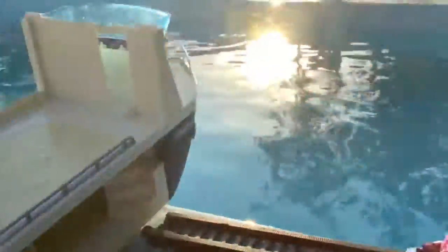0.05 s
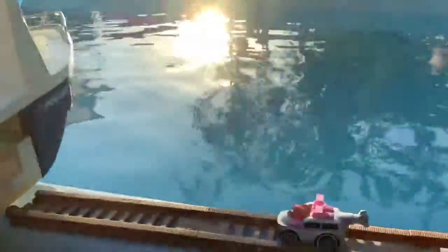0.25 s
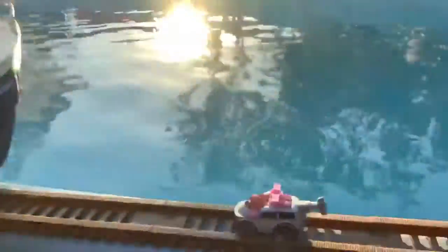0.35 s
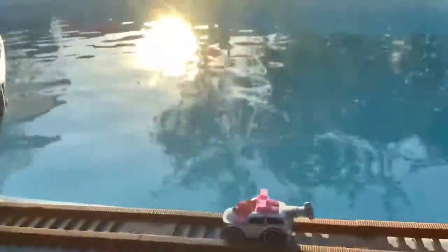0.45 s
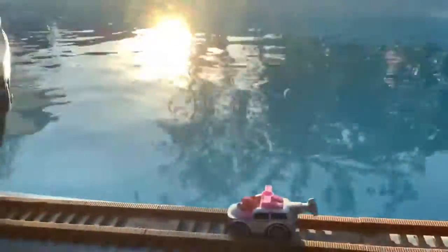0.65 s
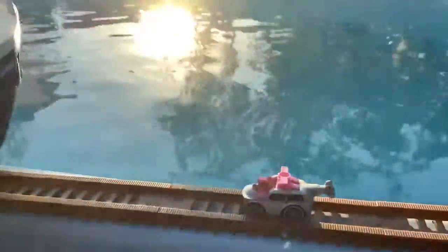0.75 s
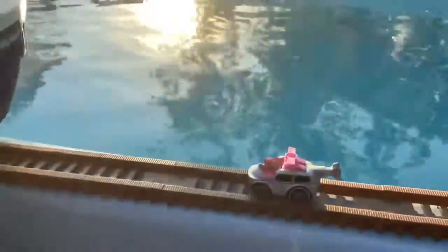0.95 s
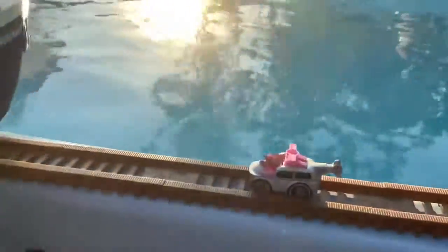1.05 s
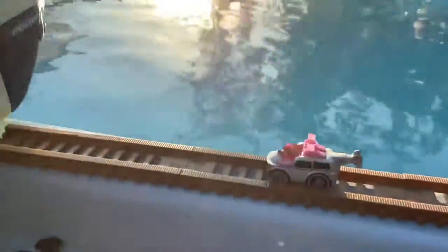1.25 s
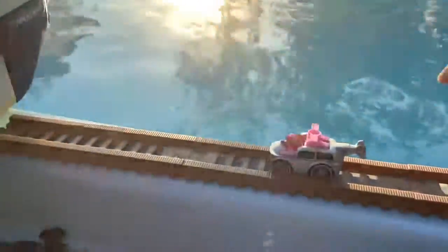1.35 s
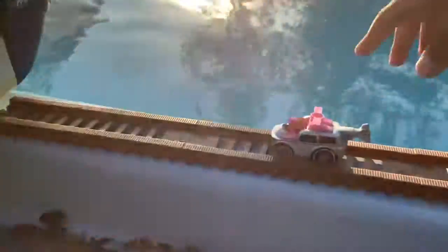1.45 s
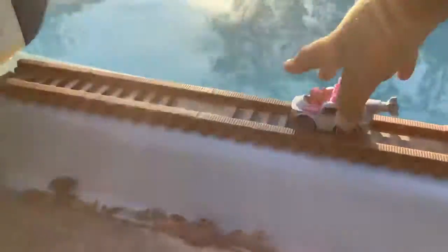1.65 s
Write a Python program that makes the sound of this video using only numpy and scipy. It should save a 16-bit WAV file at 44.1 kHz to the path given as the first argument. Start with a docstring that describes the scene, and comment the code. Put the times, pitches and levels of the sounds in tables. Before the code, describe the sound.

A small toy vehicle hits a plastic track at about 0.2 seconds with close, hollow knocks and sharp clicks. It scrapes briefly, thumps again around 0.4 seconds, then knocks and clacks just after 0.6. Faint wheel ticks follow until about 1 second as it rolls to rest. A few soft bumps and scuffs continue to around 1.7 seconds over a quiet, low outdoor rumble.

```python
"""Toy vehicle on a plastic track

A small toy is set on a plastic track beside a pool, very close. Each knock spreads as it travels through
the plastic, treble first and bass last, and lands as a short hollow thump. Hard edges click, the shell
clacks, the toy scrapes and rolls with faint ticks, then a few soft bumps sink into a low outdoor bed."""
import sys
import numpy as np
from scipy.fft import rfft, irfft, next_fast_len
from scipy.io import wavfile
from scipy.ndimage import map_coordinates

SR = 44100
rng = np.random.default_rng(int(sys.argv[2]) if len(sys.argv) > 2 else 0)


def output_pcm(signal):
    """Save a mono or channel-first signal as 16-bit PCM at the path in sys.argv[1].

    Samples are clipped to [-1, 1] before scaling.
    """
    pcm = np.clip(np.atleast_2d(signal).T, -1, 1) * 32767
    wavfile.write(sys.argv[1], SR, np.round(pcm).astype(np.int16))


N = 74970

# outdoor bed, EQ of the rumble and of the air above it: f/Hz, level/dB
RUMBLE_EQ = [(55, -3.5), (120, -1), (190, -7), (320, -8.5), (420, -20), (750, -22.5), (1200, -38.5)]
AIR_EQ = [(410, -14), (700, -5.5), (1450, -5.5), (6000, -21.5), (16000, -33.5)]
# fader ride of the air: t/s, level/dB
AIR_RIDE = [(0, -65), (.9, -61.5), (1.12, -63.5), (1.36, -57), (1.56, -60.5), (1.66, -52.5)]
# fader rides of the sliding toy's scrape, hiss and swish: t/s, level/dB
SCRAPE_RIDE = [(.17, -56), (.21, -37), (.28, -36), (.297, -30.5), (.34, -27), (.43, -33), (.52, -40.5),
               (.61, -34), (.70, -43.5), (.80, -40.5), (1.0, -51.5)]
HISS_RIDE = [(.17, -65), (.235, -49), (.275, -59.5), (.305, -48.5), (.37, -48.5), (.47, -55), (.605, -54),
             (.635, -61.5), (.655, -54.5), (.72, -64), (.97, -64.5), (1.03, -78)]
SWISH_RIDE = [(.74, -86), (.795, -54), (.85, -92)]
# EQ of the same three layers: f/Hz, level/dB
SCRAPE_EQ = [(30, -11.5), (90, 4), (330, -8), (600, -14), (1150, -26), (1600, -23.5), (3000, -33.5),
             (6000, -42)]
HISS_EQ = [(2500, -14), (6000, -11.5), (7600, -1.5), (9600, 0), (11000, -7.5), (15500, -15)]
SWISH_EQ = [(10500, -5), (13200, -4), (14500, -16)]
# blows on the track: t/s, level/dB, bass edge/Hz, treble edge/Hz, roll-off/(dB/octave), lag at 100 Hz/ms
KNOCK_CUES = [ (0.1849, -25.5, 170, 330, 22, 7), (0.2245, -4.5, 69, 760, 14.5, 3.25),
              (0.2275, -2, 103, 2270, 18.5, 8.54), (0.2361, -5.5, 121, 120, 29, 6.42),
              (0.3805, -1.5, 170, 171, 16, 9.5), (0.3944, -9.5, 69.4, 131, 26, 4.9),
              (0.4389, -7, 53.7, 1280, 28, 7.3), (0.4418, -3.5, 48.2, 216, 20.5, 4.59),
              (0.4458, -10, 480, 1410, 12, 7.09), (0.4783, -25.5, 149, 500, 20, 11),
              (0.5656, -14.5, 85, 345, 17.5, 9.5), (0.6214, -5.5, 51, 1100, 14.5, 10.84),
              (0.6221, -0.5, 274, 273, 14, 4.1), (0.6535, -14.5, 120, 170, 14, 6.36),
              (1.050, -35.5, 139, 257, 19, 7.89), (1.145, -31.5, 74.5, 128, 14, 7.83),
              (1.206, -34, 99, 219, 17, 7.8), (1.392, -29.5, 109, 170, 15, 12.2),
              (1.663, -30.5, 57.7, 200, 7, 8), ]
# clicks of hard edges and light scuffs: t/s, level/dB, t60/s
CLICK_CUES = [(.2221, -15, 0.0093), (.2231, -14, 0.017), (.2325, -28, 0.052), (.2905, -29, 0.0074),
              (.3275, -22, .005), (.3400, -13.5, 0.0041), (.3417, -13.5, .005), (.4392, -28, 0.022),
              (.6222, -16.5, 0.0098), (.6516, -24.5, 0.024)]
SCUFF_CUES = [(1.006, -41.5, 0.077), (1.387, -34.5, 0.062), (1.664, -34.5, 0.088)]
# short taps on the track, bright wheel ticks and a few dull little knocks, all given one colour: t/s, level/dB
TICK_CUES = [(.73, -36), (.741, -34), (0.7566, -34.5), (.7996, -31.5), (.8445, -38), (0.8618, -37.5),
             (.881, -37), (.9356, -32), (.9530, -26.5)]
# EQ of the clicks, ticks and scuffs: f/Hz, level/dB
CLICK_EQ = [(1500, -10), (4000, -4.5), (6000, -9), (8000, -2.5), (9500, -2.5), (12000, -9.5), (15500, -27)]
TICK_EQ = [(300, -1), (3600, 0), (6000, -7), (9500, -2), (13000, -26)]
SCUFF_EQ = [(750, 1), (1500, 5.5), (2500, -9.5), (5000, -11.5), (8000, -25)]
# resonances of the dragged wheels, each at its loudest: f/Hz, level/dB, t/s
WHEEL_RESONANCES = [(564.6, -31.5, .353), (860, -39, .322), (1577, -42, 0.328), (2970, -49, .317)]
# hits on the toy's shell: t/s, level/dB
CLACK_CUES = [(0.6214, -23), (.6518, -10.5)]
# modes of the shell: f/Hz, level/dB, t60/s
SHELL_MODES = [(1780, -2, 0.0086), (2195, -4.5, 0.0088), (3750, -5, 0.0053), (6760, -17, 0.0053)]


def amp(db):
    """Decibels to gain."""
    return 10 ** (np.asarray(db) / 20)


def unit(x):
    """Scale to rms 1."""
    return x / np.sqrt(np.mean(x ** 2) + 1e-20)


def noise(eq, length=N):
    """Noise of rms 1 through an EQ of (f/Hz, level/dB) points, rolling off steeply outside them."""
    size = next_fast_len(length + 8192)
    octave = np.log2(np.fft.rfftfreq(size, 1 / SR) + 1)
    hz, db = np.transpose(eq)
    knots = np.log2(hz + 1)
    outside = np.abs(octave - np.clip(octave, knots[0], knots[-1]))
    gain = amp(np.interp(octave, knots, db) - 20 * outside)
    return unit(irfft(rfft(rng.standard_normal(length), size) * gain, size)[:length])


def fluttering_noise(eq, depth_db, rate_hz):
    """Coloured noise of rms 1 whose level flutters at random."""
    flutter = map_coordinates(rng.standard_normal(1024), [np.arange(N) * rate_hz / SR], mode="mirror")
    return unit(noise(eq) * amp(depth_db * flutter))


def fader(ride):
    """Gain per sample from (t/s, level/dB) points."""
    return amp(np.interp(np.arange(N) / SR, *np.transpose(ride)))


def minimum_phase(db):
    """Spectrum of the tightest causal pulse with the shape db."""
    cepstrum = irfft(np.log(np.maximum(amp(db - db.max()), 1e-6)))
    half = len(cepstrum) // 2
    return np.exp(rfft(np.r_[cepstrum[0], 2 * cepstrum[1:half], np.zeros(half)]))


def add(track, s, sound):
    """Mix a sound into the track at time s."""
    start = round(s * SR)
    track[start:start + len(sound)] += sound[:max(N - start, 0)]


def bursts(cues, eq, attack_s=.0001):
    """Short dying bursts of noise through one EQ, from cues of t/s, level/dB, t60/s."""
    out, t = np.zeros(N), np.arange(SR // 10) / SR
    for s, db, t60 in cues:
        envelope = amp(db - 60 * t / t60) * (1 - np.exp(-t / attack_s))
        add(out, s, noise(eq, len(t)) * envelope / 2)
    return out


def outdoor_bed(rumble_db=-45.5):
    """A low outdoor rumble with faint air above it."""
    rumble = amp(rumble_db) * fluttering_noise(RUMBLE_EQ, depth_db=1, rate_hz=20)
    return rumble + fader(AIR_RIDE) * noise(AIR_EQ)


def whine(hz=10040, db=-73.5, end_s=.96, fade_s=.05):
    """A thin, nearly steady whine that stops as the toy comes to rest."""
    t = np.arange(N) / SR
    phase_drift = np.cumsum(rng.standard_normal(N)) * 12 / np.sqrt(SR)
    fade = np.clip((end_s - t) / fade_s, 0, 1)
    return amp(db) * unit(np.sin(2 * np.pi * hz * t + phase_drift)) * fade


def sliding(hiss_rise=1.07, rise_span_s=(.37, .62)):
    """Plastic rubs on plastic: a gritty low scrape, a fine hiss that climbs a little, one last swish."""
    scrape = fader(SCRAPE_RIDE) * fluttering_noise(SCRAPE_EQ, depth_db=3, rate_hz=110)
    raised_eq = [(hz * hiss_rise, db) for hz, db in HISS_EQ]
    crossfade = np.interp(np.arange(N) / SR, rise_span_s, [0, np.pi / 2])
    hiss = np.cos(crossfade) * noise(HISS_EQ) + np.sin(crossfade) * noise(raised_eq)
    return scrape + fader(HISS_RIDE) * hiss + fader(SWISH_RIDE) * noise(SWISH_EQ)


def knocks(lag_power=.91, lag_knee_hz=20.36, tilt_db_per_oct=-4.5, low_cut_db_per_oct=21):
    """Each blow is one pulse; bending waves carry its bass more slowly, making a falling thump."""
    out, size = np.zeros(N), 8192
    f = np.fft.rfftfreq(size, 1 / SR) + 1
    lag_shape = ((100 + lag_knee_hz) / (f + lag_knee_hz)) ** lag_power
    tilt = tilt_db_per_oct * np.log2(f)
    for s, db, low_hz, high_hz, roll_off, lag_ms in KNOCK_CUES:
        octaves_below = np.log2(1 + (low_hz / f) ** 6) / 6
        octaves_above = np.log2(1 + (f / high_hz) ** 6) / 6
        blow = minimum_phase(tilt - low_cut_db_per_oct * octaves_below - roll_off * octaves_above)
        lag_s = lag_ms / 1000 * lag_shape
        turns = np.cumsum(lag_s[::-1])[::-1] * SR / size  # phase is lag summed over frequency
        thump = irfft(blow * np.exp(2j * np.pi * turns))[:size // 2]
        add(out, s, amp(db) * thump / np.abs(thump).max())
    return out


def contacts(tick_t60=.004):
    """Hard edges click, wheels tick, small dull knocks tap the track and the toy lightly scuffs it."""
    ticks = [(s, db, tick_t60) for s, db in TICK_CUES]
    return bursts(CLICK_CUES, CLICK_EQ) + bursts(ticks, TICK_EQ) + bursts(SCUFF_CUES, SCUFF_EQ)


def wheels(rise_oct_per_s=3, swell_s=.022, relative_width=.09, rough_hz=600):
    """The dragged wheels sing roughly in a few resonances, each swelling and fading as it climbs."""
    out, t = np.zeros(N), np.arange(N) / SR
    for hz, db, s in WHEEL_RESONANCES:
        pitch = hz * 2 ** (rise_oct_per_s * np.minimum(t - s, 2 * swell_s))
        grit_eq = [(10, 0), (hz * relative_width, 0)]
        grit = hz / rough_hz * (noise(grit_eq) + 1j * noise(grit_eq))  # higher modes are noisier
        ring = (1 + grit) * np.exp(2j * np.pi * np.cumsum(pitch) / SR)
        swell = np.exp(-((t - s) / swell_s) ** 2)
        out += amp(db) * unit(ring.real) * swell
    return out


def clacks():
    """The toy's hollow plastic shell rings for a few milliseconds."""
    out, t = np.zeros(N), np.arange(SR // 20) / SR
    for s, db in CLACK_CUES:
        ring = np.zeros(len(t))
        for k, (hz, mode_db, t60) in enumerate(SHELL_MODES):
            decay = amp(mode_db + rng.normal(0, 1) - 60 * t / t60)
            ring += (-1) ** k * decay * np.sin(2 * np.pi * hz * t)
        add(out, s, amp(db) * ring / np.abs(ring).max())
    return out


def scene():
    """A mono mix, close and dry in the open air."""
    return (outdoor_bed() + whine() + sliding() + knocks() + contacts() + wheels() + clacks())[None]


def record(dry, high_cut_hz=15900):
    """A soft clip rounds the tallest peaks, then a brick-wall filter trims the top."""
    clipped = dry / (1 + np.abs(dry) ** 8) ** (1 / 8)
    size = next_fast_len(N + SR // 2)
    passband = np.fft.rfftfreq(size, 1 / SR) < high_cut_hz
    return irfft(rfft(clipped, size) * passband, size)[:, :N]


dry = scene()
out = record(dry)
output_pcm(out)
```